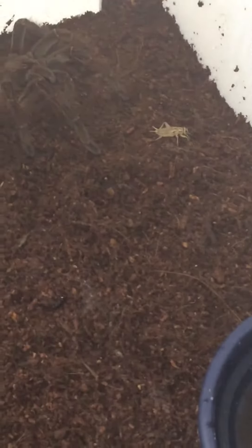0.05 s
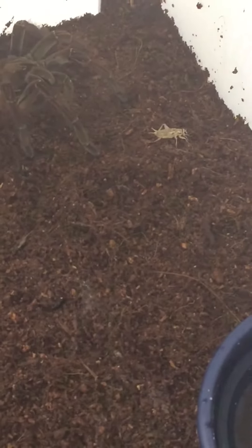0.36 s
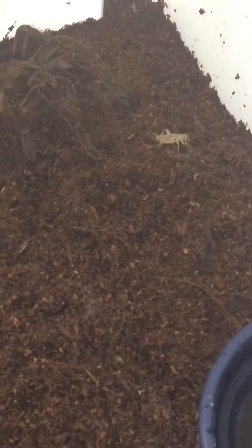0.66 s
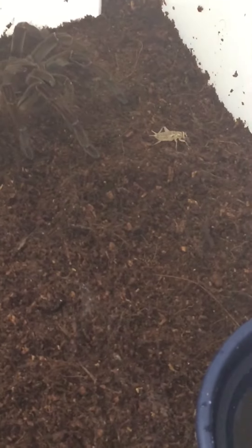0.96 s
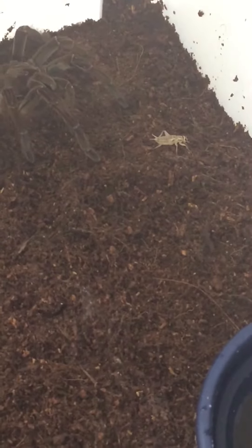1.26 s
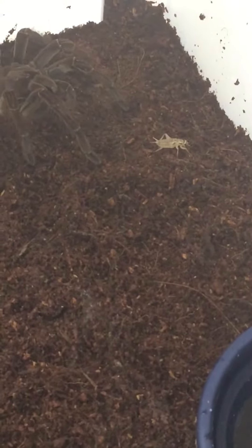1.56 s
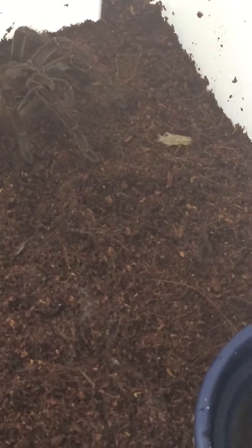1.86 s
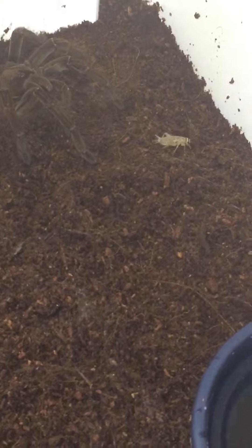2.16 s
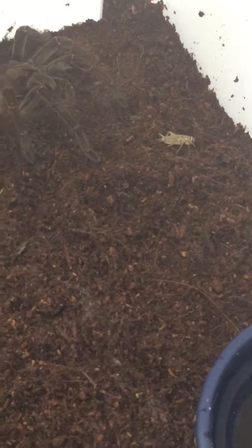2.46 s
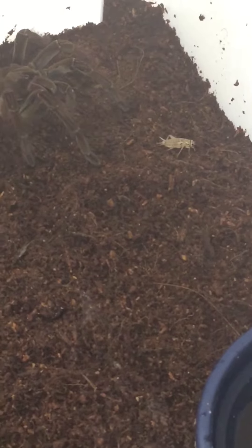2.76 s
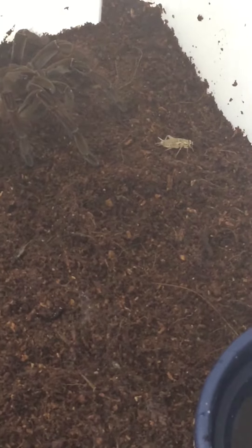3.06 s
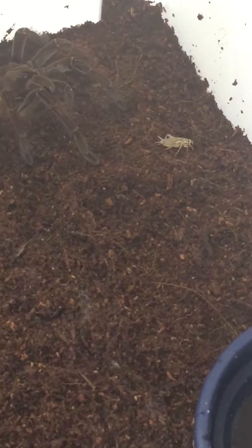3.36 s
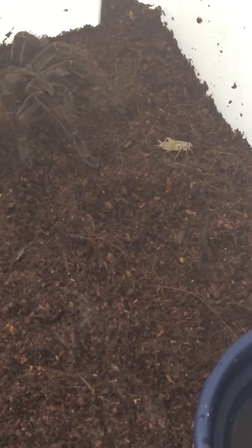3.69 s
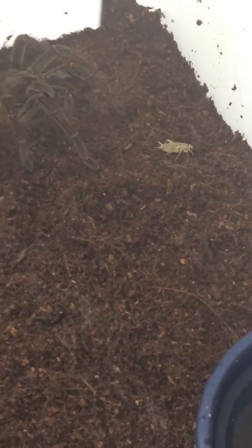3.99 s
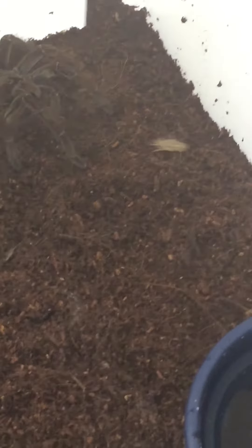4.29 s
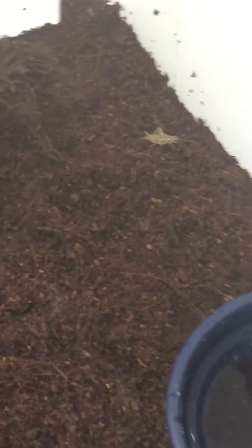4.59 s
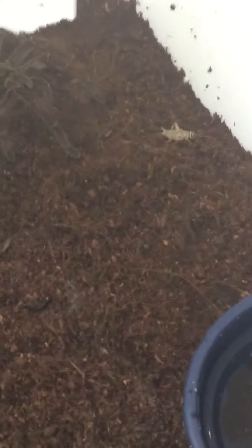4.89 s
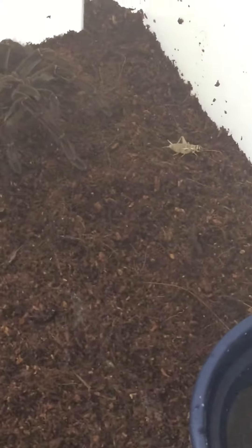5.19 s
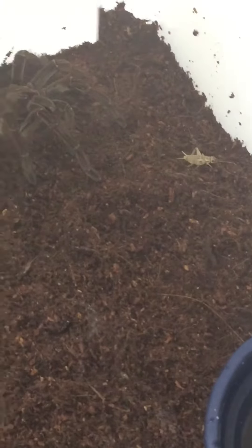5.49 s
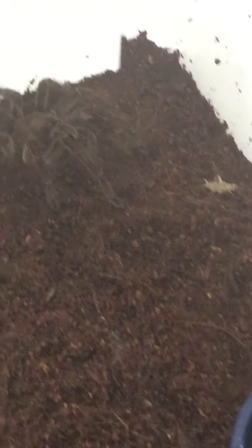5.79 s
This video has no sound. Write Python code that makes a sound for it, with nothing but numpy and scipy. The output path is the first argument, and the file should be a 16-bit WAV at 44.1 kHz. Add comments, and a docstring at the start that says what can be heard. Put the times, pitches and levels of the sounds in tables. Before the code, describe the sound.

A plastic cup rubs against a plastic tub in short, soft strokes that swell and ease off. The tub takes two quick, hollow knocks. After a pause the rubbing returns and grows into loud scuffs and a brief clatter of the cup. Faint taps and a cricket's tiny rustles in dry bedding follow. Everything is close to the microphone in a small room with a low hum.

```python
"""A plastic cup is handled at a plastic tub holding a cricket on dry bedding, close up in a small room.
First, plastic rubs in short stick-slip strokes that swell and ease off. Near 2 s the tub is knocked
twice; its walls and floor ring. Rubbing resumes, and from 4.2 s the cup scuffs and clatters hard enough
to overload. Faint rustles and taps follow. A low room hum runs throughout."""
import sys
import numpy as np
from scipy import signal
from scipy.fft import rfft, irfft, next_fast_len
from scipy.io import wavfile
from scipy.ndimage import uniform_filter1d

SR = 44100
rng = np.random.default_rng(int(sys.argv[2]) if len(sys.argv) > 2 else 0)


def transcribe(u):
    """Save the signal u as a 16-bit wav file named by the first command-line argument.

    u: samples, shape (n,) or (channels, n), limited to [-1, 1]; the rate is SR.
    q: integer samples, one column per channel.
    """
    v = np.clip(np.atleast_2d(u).T, -1, 1)
    q = np.round(v * 32767).astype(np.int16)
    wavfile.write(sys.argv[1], SR, q)


N = 261954
TIME_S = np.arange(N) / SR
RING_S = TIME_S[:int(.8 * SR)]

# Event levels are before each layer's own gain.
# Each row: start in seconds, then clack, thud and tick levels in dB.
CUP_BLOWS = [(4.347, -3.5, -9, -9.5), (4.373, -10, -20.5, -21), (4.4, -17.5, -28, -32),
             (4.482, -20.5, -23, -41), (4.512, -28, -26.5, -43), (4.532, -16.5, -21.5, -29),
             (4.547, -17.5, -23.5, -34)]
# Each row: start in seconds, then clack, thud, tick and boom levels in dB.
TUB_KNOCKS = [(1.91, -15, -15, -34.5, -33.5), (1.921, -23.5, -18.5, -31.5, -26),
              (1.99, -21, -21.5, -29.5, -25)]
# Each row: start in seconds, rasp, hiss and wall swing levels in dB, slip time in seconds.
SCUFFS = [(0.238, -62, -58, -46.5, 0.015), (0.654, -53, -47, -44, .008), (1.034, -60, -93, -31.5, .012),
          (1.084, -45, -52, -36.5, 0.016), (1.164, -37.5, -47.5, -38, 0.0047),
          (3.123, -58.5, -65.5, -53.5, 0.009), (3.301, -57, -75, -55, 0.0063),
          (3.339, -49, -69.5, -42.5, 0.0061), (3.377, -49.5, -52, -55, 0.004),
          (3.465, -60, -54, -41, 0.0058), (3.749, -41, -57.5, -42, 0.005), (3.92, -31, -42.5, -23, 0.004),
          (3.97, -28, -48.5, -25.5, 0.0051), (4.263, -22, -35, -17, 0.004), (4.268, -16, -36.5, -20, .011),
          (4.611, -14.5, -40.5, -16, 0.0052), (4.758, -25.5, -64, -32.5, 0.0092)]
# Each row: start, attack, hold and release in seconds, rasp level in dB,
# then treble, wall rumble and boom in dB relative to the rasp.
RUB_STROKES = [(0.211, 0.13, .06, 0.15, -49.5, 1.5, 4.5, 4.5),
               (0.533, 0.13, 0.059, 0.15, -42, -3.5, 6.5, 0.5), (0.968, 0.19, 0.075, 0.16, -41, -1, 2, 3),
               (1.347, 0.06, 0.171, .07, -65.5, 4, 7.5, 6), (3.347, .11, 0.098, .135, -50, -4, 8, 6),
               (3.731, 0.032, 0.19, .1, -42, 0, 6, -3), (3.963, 0.021, 0.032, .1, -33, -2.5, 1, 12),
               (4.022, .11, 0.11, .1, -30.5, 5, 1, -6.5), (4.25, .03, 0.041, .07, -19, -5.5, -8, -5.5),
               (4.365, 0.021, 0.14, .15, -32, 0.5, -1.5, -5),
               (4.528, 0.021, 0.043, 0.18, -23.5, -1, -1, -21)]
# Each row: start and length in seconds, level in dB, pitch and bandwidth in Hz.
SKIDS = [(0.565, 0.068, -44.5, 1740, 1250), (1.159, 0.023, -34, 2310, 810), (1.338, .25, -62, 1230, 330),
         (1.563, 0.044, -63, 1130, 400), (3.121, 0.038, -63, 1080, 398), (4.068, 0.045, -36, 889, 199),
         (4.286, 0.046, -25, 1390, 1160)]
# Each row: start and length in seconds, level in dB.
BEDDING_RUSTLES = [(0.056, 0.087, -74), (5.001, 0.046, -80), (5.358, .04, -77), (5.64, .03, -74.5),
                   (5.731, 0.075, -68.5), (5.865, 0.093, -74.5)]
# Each row: start in seconds, level in dB.
TAPS = [(5.336, -62.5), (5.366, -73), (5.642, -70.5), (5.725, -66), (5.753, -64), (5.867, -65.5),
        (5.904, -64.5)]

# Modes of cup, tub walls, tub floor and tapped plastic.
# Each row: frequency in Hz, relative level in dB, T60 in seconds.
CUP_MODES = [(524, -13, 0.12), (695, -4, 0.18), (692, -8, 0.27), (816, -9.5, 0.11), (925.5, -4.5, .22),
             (1163, -2.5, .33), (1232, -10, 0.44), (1247, -6, 0.48), (1246, -10, .45), (1389, -7.5, 0.13),
             (1505, -5.5, 0.35), (1487, -5, 0.25), (1630, -12, 0.35), (1736, 3, 0.15), (1952, -6.5, 0.15),
             (2143, -5, 0.12), (3316, -12, .15), (4386, -18.5, .18)]
WALL_MODES = [(181, -9.5, 0.12), (230.6, -2.5, 0.29), (262, 3, 0.081), (307, -3, 0.084), (392, -5, 0.066),
              (458, -13.5, 0.054), (505, -10.5, 0.11)]
FLOOR_MODES = [(61.1, -5.5, 0.092), (80.6, 1, 0.23), (113.4, 4, 0.18), (123.8, 0, 0.11)]
TAP_MODES = [(1580, -12.5, 0.19), (1726, -1, 0.068), (3320, -13, .15), (3370, -9.5, .08)]

# Spectra of struck plastic, rubbed plastic (bite is the upper rasp) and room air.
# Each row: frequency in Hz, relative density in dB.
CUP_CLACK_SPECTRUM = [(150, -6.5), (370, -0.5), (500, -2.5), (600, -8.5), (850, 1.5), (1020, -3.5),
                      (1280, 4.5), (1750, 1.5), (2200, -4.5), (3200, -10.5), (5000, -18.5), (6500, -18.5),
                      (9000, -36)]
TUB_CLACK_SPECTRUM = [(150, -32.5), (450, 0), (680, 4), (950, -6), (1250, -4), (1800, -6.5), (2400, -3.5),
                      (3200, -11), (4200, -10.5), (5200, -25), (8000, -34)]
RASP_SPECTRUM = [(250, -25.5), (400, 0.5), (560, 4.5), (850, 1), (1050, -0.5), (1250, -0.5), (1600, -4.5),
                 (2200, -7.5), (3500, -29.5)]
BITE_SPECTRUM = [(1200, -23), (2000, -3), (2500, 1), (3100, -0.5), (3600, -0.5), (4450, -5), (5100, -13.5),
                 (7500, -34.5)]
HISS_SPECTRUM = [(3000, -30), (5000, -1), (6500, 1), (8000, -2.5), (9400, -2.5), (10300, -10.5),
                 (15000, -16)]
RUMBLE_SPECTRUM = [(100, -21), (160, -1), (200, 3), (250, -2.5), (310, -10.5), (380, -13.5), (600, -39)]
BOOM_SPECTRUM = [(25, -22), (45, -15), (62, -2), (80, -2), (115, 3.5), (150, -18), (250, -30)]
AIR_SPECTRUM = [(120, -26), (200, -6), (236, -9.5), (407, -12), (728, -14), (842, -17), (1030, -15.5),
                (1300, -19.5), (2700, -18.5), (15400, -30.5)]

# Room hum. Each row: centre and width in Hz, rms level in dB.
HUM_BANDS = [(59.6, 8.1, -66.5), (87, 27, -68), (106, 10, -54.5), (125, 9.9, -61), (164.5, 21, -67),
             (252, 10, -77.5)]
# Room decay. Each row: frequency in Hz, T60 in seconds.
ROOM_T60 = [(80, 0.39), (250, .42), (700, 0.3), (1300, .66), (2500, 0.25), (6000, 0.39), (14000, 0.15)]


def cup_blows():
    """The hollow cup rings at each blow and thumps the tub's walls and floor."""
    hits, ring = np.zeros(N), np.zeros(N)
    for start_s, clack_db, thud_db, tick_db in CUP_BLOWS:
        clack = undb(clack_db + 2.5) * crack(CUP_CLACK_SPECTRUM, t60_s=0.057, snap=2.3)
        walls = undb(-3.5) * modes(WALL_MODES, scatter_db=-4, flex=0.008)
        floor = undb(-0.5) * modes(FLOOR_MODES, scatter_db=-0.5, flex=0.01)
        tick = undb(tick_db - 5) * crack(HISS_SPECTRUM, t60_s=.04, snap=8.7)
        add(hits, start_s, clack + undb(thud_db) * (walls + floor) + tick)
        add(ring, start_s, undb(clack_db - 6) * modes(CUP_MODES, scatter_db=0, flex=0.00067))
    return room(hits, wet_db=-12) + room(ring, wet_db=-21)


def tub_knocks():
    """Each knock cracks on the rim, shakes walls and floor and rocks the whole tub."""
    out = np.zeros(N)
    rocking = undb(-2.5) * unit_onset(np.sin(2 * np.pi * 48 * RING_S) * fade(t60_s=.18))
    for start_s, clack_db, thud_db, tick_db, boom_db in TUB_KNOCKS:
        clack = undb(clack_db - 2.5) * crack(TUB_CLACK_SPECTRUM, t60_s=0.033, snap=9.1)
        tick = undb(tick_db - 9.5) * crack(HISS_SPECTRUM, t60_s=0.04, snap=16)
        thud = undb(thud_db - 2.5) * modes(WALL_MODES, scatter_db=10, flex=0.058)
        boom = undb(boom_db) * (modes(FLOOR_MODES, scatter_db=4, flex=.02) + rocking)
        add(out, start_s, clack + tick + thud + boom)
    return room(out, wet_db=-9)


def scuffs():
    """Plastic scuffs: a short burst of slips with a low thump and faint cup ring."""
    out = np.zeros(N)
    for start_s, rasp_db, hiss_db, swing_db, slip_s in SCUFFS:
        swell = np.sqrt(RING_S) * np.exp(-RING_S / slip_s)
        burst = slips(len(RING_S), per_s=6500, spread_db=-4.5) * swell
        rasp = undb(rasp_db - 6.5) * unit_onset(colour(burst, RASP_SPECTRUM))
        hiss = undb(hiss_db - 10) * unit_onset(colour(burst, HISS_SPECTRUM))
        bite = undb((rasp_db + hiss_db) / 2 - 2) * unit_onset(colour(burst, BITE_SPECTRUM))
        walls = undb(swing_db - 8) * modes(WALL_MODES, scatter_db=5, flex=0.011)
        floor = undb(swing_db - 6) * modes(FLOOR_MODES, scatter_db=3, flex=0.062)
        cup = undb(rasp_db - 13) * modes(CUP_MODES, scatter_db=1.5, flex=0.02)
        add(out, start_s, rasp + hiss + bite + walls + floor + cup)
    return room(out, wet_db=-5)


def rubbing(wall_lag_s=0.015):
    """Slips rasp and hiss, brighter under more pressure; the tub's rumble lags behind."""
    out = np.zeros(N)
    friction = slips(N, per_s=1300, spread_db=3.2)
    spectra = RASP_SPECTRUM, BITE_SPECTRUM, HISS_SPECTRUM, RUMBLE_SPECTRUM, BOOM_SPECTRUM
    layers = (room(colour(friction, spectrum), wet_db=3.5) for spectrum in spectra)
    rasp, bite, hiss, rumble, boom = (unit_rms(wander(x, depth_db=2.5)) for x in layers)
    for start_s, attack_s, hold_s, release_s, rasp_db, treble_db, rumble_db, boom_db in RUB_STROKES:
        press = pressure(start_s, attack_s, hold_s, release_s)
        lagged = pressure(start_s + wall_lag_s, attack_s, hold_s, release_s)
        treble = undb(-8.5) * bite * press ** 1.1 + undb(-17) * hiss * press ** 1.5
        bass = undb(rumble_db) * rumble * lagged ** .9 + undb(boom_db) * boom * lagged ** .91
        out += undb(rasp_db) * (rasp * press + undb(treble_db) * treble + bass)
    return out


def skids_and_rustles():
    """Brief swells of quick slips: squeaky on plastic, thin and dry in the bedding."""
    out = np.zeros(N)
    for start_s, length_s, db, hz, width_hz in SKIDS:
        n = int(length_s * SR)
        skid = band(slips(n, per_s=3000, spread_db=1), hz, width_hz)
        add(out, start_s, undb(db) * unit_rms(skid * np.hanning(n) ** .75))
    for start_s, length_s, db in BEDDING_RUSTLES:
        n = int(length_s * SR)
        rustle = band(slips(n, per_s=2000, spread_db=2), hz=7000, width_hz=16000)
        add(out, start_s, undb(db) * unit_rms(rustle * np.hanning(n)))
    return room(out, wet_db=-10.5)


def taps():
    """Light taps on plastic: a fine ring and a soft clack."""
    out = np.zeros(N)
    for start_s, db in TAPS:
        ring = undb(-7.5) * modes(TAP_MODES, scatter_db=6.5, flex=0.0048)
        clack = undb(-5) * crack(CUP_CLACK_SPECTRUM, t60_s=.08, snap=0.92)
        add(out, start_s, undb(db) * (ring + clack))
    return room(out, wet_db=-0.5)


def room_tone(air_db=-70):
    """A beating low hum over faint air noise."""
    hum = sum(undb(db) * unit_rms(band(rng.standard_normal(N), hz, width_hz))
              for hz, width_hz, db in HUM_BANDS)
    return hum + undb(air_db) * unit_rms(colour(rng.standard_normal(N), AIR_SPECTRUM))


def room(x, wet_db):
    """Add a small room's diffuse echoes, shortest in the top treble."""
    n = len(RING_S)
    centres_hz = 60 * 2. ** np.arange(9)
    noise = rfft(rng.standard_normal(n))
    octave = np.log2(np.clip(np.fft.rfftfreq(n, 1 / SR), centres_hz[0], centres_hz[-1]))
    tail = np.zeros(n)
    for hz in centres_hz:
        weight = np.maximum(1 - np.abs(octave - np.log2(hz)), 0)
        tail += irfft(noise * weight, n) * fade(log_interp(ROOM_T60, hz))
    tail *= 1 - np.exp(-RING_S / 0.002)
    tail /= np.sqrt(np.sum(tail ** 2))
    return x + undb(wet_db) * signal.fftconvolve(x, tail)[:N]


def crack(spectrum, t60_s, snap):
    """A sharp snap and the dense, short ring of thin plastic."""
    burst = rng.standard_normal(len(RING_S)) * fade(t60_s)
    burst[0] -= snap
    return unit_onset(colour(np.roll(burst, SR // 900), spectrum))


def modes(table, scatter_db, flex):
    """Ring of a struck body; each blow lands elsewhere, reweights the modes and bends their pitch."""
    ring = np.zeros(len(RING_S))
    for (hz, db, t60_s), (size, side, bend) in zip(table, rng.standard_normal((len(table), 3))):
        phase = 2 * np.pi * hz * (1 + flex * bend) * RING_S
        swing = np.cos(phase) * (1 - np.exp(-phase))  # wall speed builds within one cycle
        ring += np.sign(side) * undb(db + scatter_db * size) * swing * fade(t60_s)
    return unit_onset(ring)


def slips(n, per_s, spread_db):
    """Stick-slip clicks of unequal size."""
    clicks = (rng.random(n) < per_s / SR) * rng.standard_normal(n)
    return clicks * undb(spread_db * np.minimum(rng.exponential(size=n), 4))


def pressure(start_s, attack_s, hold_s, release_s):
    """A stroke eases in, holds, then falls to a tenth in the release time."""
    age_s = TIME_S - start_s
    rise = np.clip(age_s / attack_s, 0, 1) ** 1.2
    return rise * 10 ** (-np.maximum(age_s - attack_s - hold_s, 0) / release_s)


def wander(x, depth_db):
    """The contact point moves, so narrow wall resonances come and go."""
    _, _, frames = signal.stft(x, nperseg=512)
    drift = uniform_filter1d(rng.standard_normal(frames.shape), size=4, axis=0)
    drift = uniform_filter1d(drift, size=7, axis=1)
    _, varied = signal.istft(frames * undb(depth_db * unit_rms(drift)), nperseg=512)
    return varied[:len(x)]


def colour(x, spectrum):
    """Minimum-phase filter through (Hz, dB) points; 20 dB per octave roll-off outside."""
    n = 2 * (next_fast_len(len(x) + SR // 10) // 2)
    hz = np.fft.rfftfreq(n, 1 / SR) + 1
    octaves_outside = np.abs(np.log2(hz / np.clip(hz, spectrum[0][0], spectrum[-1][0])))
    cepstrum = irfft(np.log(undb(log_interp(spectrum, hz) - 20 * octaves_outside)))
    cepstrum[1:n // 2] *= 2
    cepstrum[n // 2 + 1:] = 0
    return irfft(rfft(x, n) * np.exp(rfft(cepstrum)), n)[:len(x)]


def band(x, hz, width_hz):
    """Steep resonance."""
    bin_hz = np.fft.rfftfreq(len(x), 1 / SR) + 1
    detuning = (bin_hz ** 2 - hz ** 2) / (bin_hz * width_hz)
    return irfft(rfft(x) / (1 + detuning ** 2), len(x))


def log_interp(points, hz):
    """Read (Hz, value) points on a log-frequency axis."""
    point_hz, values = np.transpose(points)
    return np.interp(np.log(hz + 1), np.log(point_hz), values)


def fade(t60_s):
    """Exponential decay."""
    return np.exp(-np.log(1000) * RING_S / t60_s)


def undb(db):
    """Decibels to gain."""
    return 10 ** (np.asarray(db) / 20)


def unit_rms(x):
    """Scale to rms 1."""
    return x / np.sqrt(np.mean(x ** 2))


def unit_onset(x):
    """Scale to rms 1 over the first 20 ms."""
    return x / np.sqrt(np.mean(x[:SR // 50] ** 2))


def add(out, start_s, x):
    """Mix x into out."""
    i = int(start_s * SR)
    out[i:i + len(x)] += x[:N - i]


def scene():
    """All sources, mono."""
    handling = tub_knocks() + scuffs() + cup_blows() + rubbing() + skids_and_rustles() + taps()
    return (handling + room_tone())[None]


def record(dry):
    """The microphone sheds the deepest bass, the hardest blow clips flat and the top is cut."""
    low_hz, top_hz = 30, 15800
    highpass = signal.butter(2, low_hz, "high", fs=SR, output="sos")
    lowpass = signal.ellip(10, .2, 80, top_hz, fs=SR, output="sos")
    clipped = np.clip(signal.sosfilt(highpass, dry), -1, 1)
    return signal.sosfilt(lowpass, clipped)


dry = scene()
out = record(dry)
transcribe(out)
```